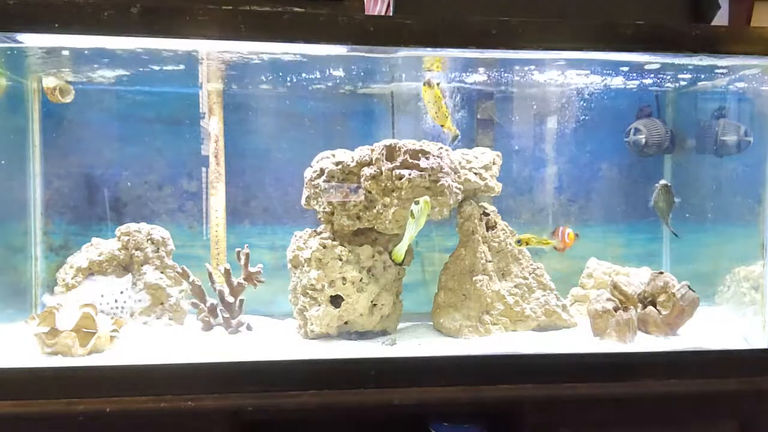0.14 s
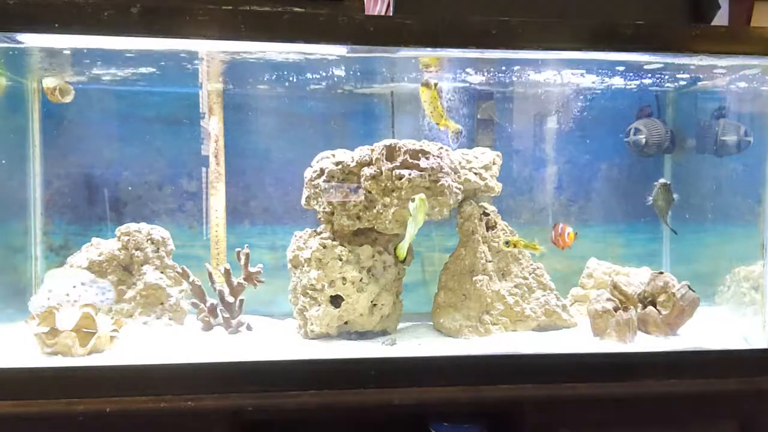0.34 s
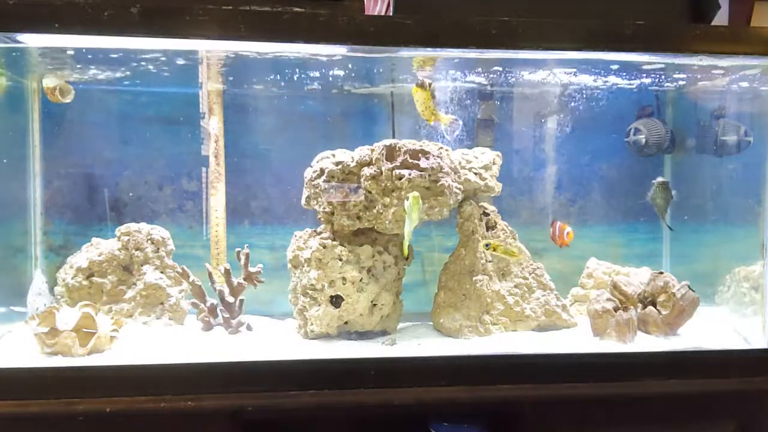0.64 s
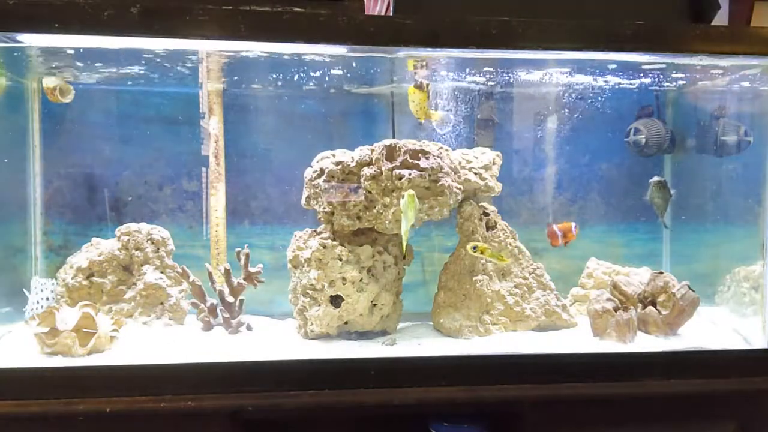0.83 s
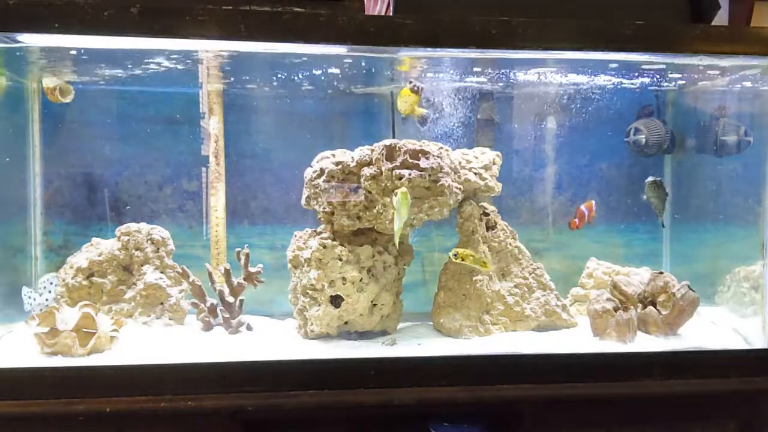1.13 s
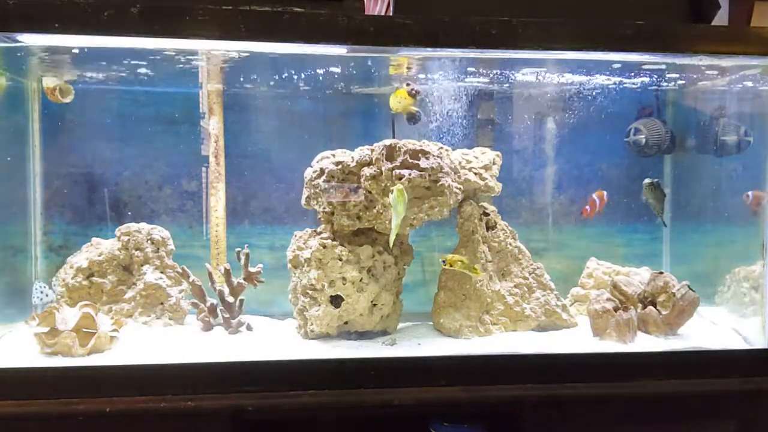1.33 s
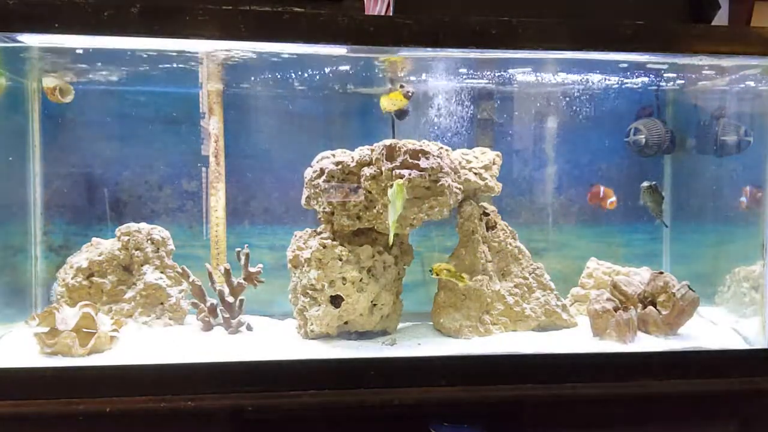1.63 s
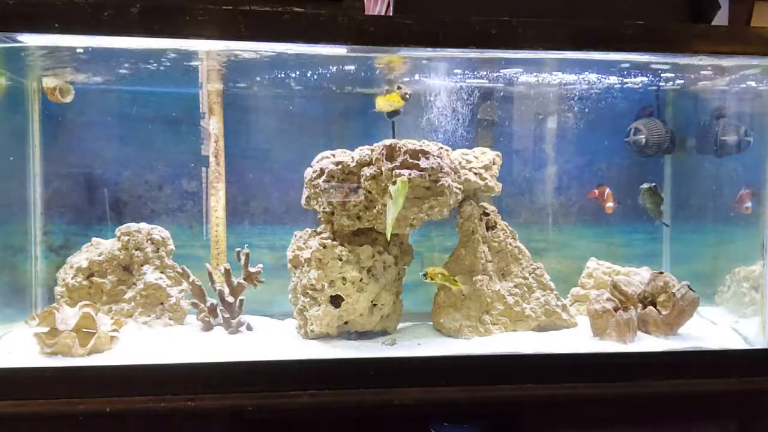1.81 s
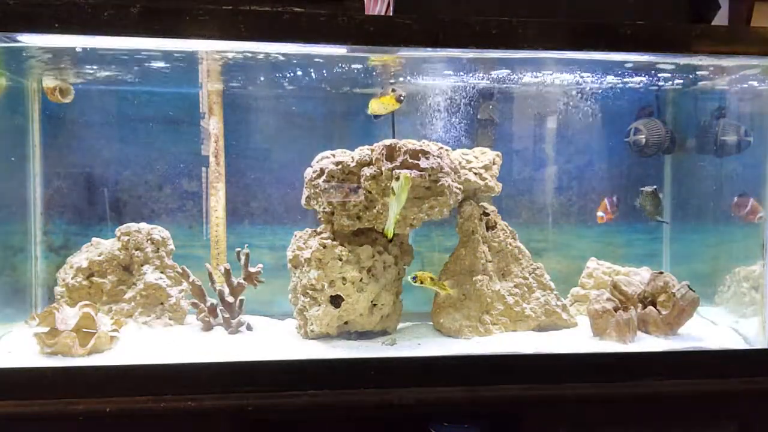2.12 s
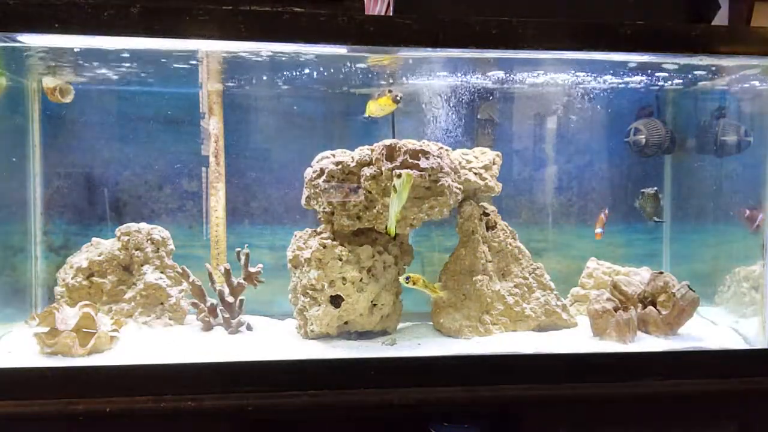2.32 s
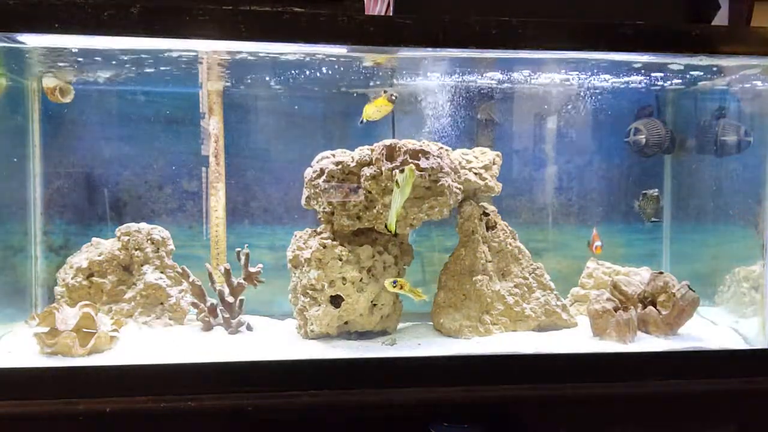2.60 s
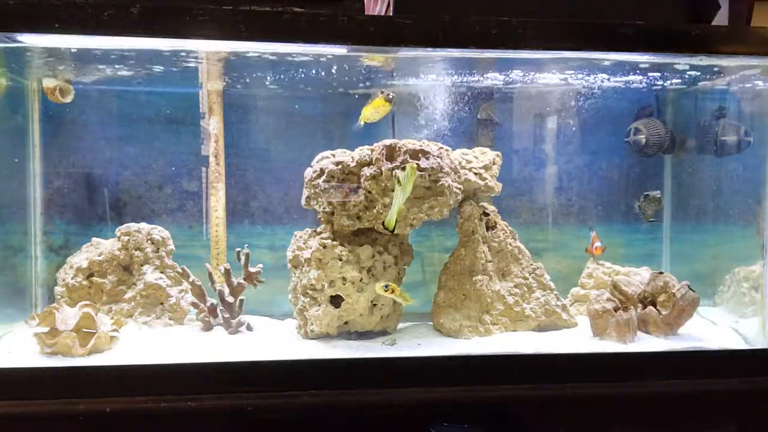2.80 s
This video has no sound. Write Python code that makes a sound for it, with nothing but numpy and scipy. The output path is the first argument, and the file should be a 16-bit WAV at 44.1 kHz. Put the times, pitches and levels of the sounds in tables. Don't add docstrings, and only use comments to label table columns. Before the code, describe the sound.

A steady fish tank pump hum with gentle bubbling, and a brief clatter of tableware nearby

```python
import sys
import numpy as np
from scipy import signal
from scipy.fft import rfft, irfft
from scipy.io import wavfile
from scipy.ndimage import uniform_filter1d

SR = 44100
rng = np.random.default_rng(int(sys.argv[2]) if len(sys.argv) > 2 else 0)


def output_pcm(signal):
    pcm = np.clip(np.atleast_2d(signal).T, -1, 1) * 32767
    wavfile.write(sys.argv[1], SR, np.round(pcm).astype(np.int16))


def gain_from_decibels(decibels):
    exponent = np.asarray(decibels, float) / 20
    return 10 ** exponent


N = 130095
SIDES = np.array([[0.5], [-0.5]])


def evened(x):
    return x / np.sqrt(np.mean(x ** 2) + 1e-20)


def read(points, hz):
    f, value = np.transpose(points)
    return np.interp(np.log(hz + 1), np.log(f + 1), value)


def add(mix, s, sound):
    part = mix[..., round(s * SR):][..., :sound.shape[-1]]
    part += sound[..., :part.shape[-1]]


def tinted(x, points):
    hz = np.fft.rfftfreq(len(x), 1 / SR)
    inside = (hz > 0.8 * points[0][0]) & (hz < points[-1][0])
    return evened(irfft(rfft(x) * gain_from_decibels(read(points, hz)) * inside, len(x)))


def drift(t, top_hz):
    waves = [np.sin(2 * np.pi * (f * t + rng.random())) / np.sqrt(f) for f in np.geomspace(1, top_hz, 24)]
    return evened(sum(waves))


# (multiple of the mains, level [dB rms])
HUM = [(1, -63.5), (2, -47.5), (3, -61), (4, -63.5), (5, -75), (6, -88.5), (8, -76.5), (9, -77), (10, -77)]


def pump():
    mains_hz, waver_db, pan_db, left_lag_s = 60.04, 0.6466, 0.5, 0.00034
    t = np.arange(N) / SR - np.array([[left_lag_s], [0]])
    slow = np.arange(0, N + 200, 200) / SR
    hum = np.zeros((2, N))
    for k, db in HUM:
        waver = waver_db * min(k * k / 4, 8) * np.interp(t, slow, drift(slow, 14))
        hum += np.sqrt(2) * gain_from_decibels(db + waver) * np.sin(2 * np.pi * (k * mains_hz * t + rng.random()))
    return gain_from_decibels(pan_db * SIDES) * hum


def bubble(hz, cycles, glide=0.0037):
    u = np.arange(int(4 * cycles / hz * SR)) / SR * hz / cycles
    return np.sin(2 * np.pi * cycles * (u + glide * u ** 2)) * (1 - np.exp(-u / 0.25)) * np.exp(-1.6 * u)


# (time [s], peak level [dB], pitch [Hz])
BUBBLES = [(0.0923, -53, 3790), (0.1794, -59, 3000), (1.7435, -52, 4380), (2.2793, -57, 3280),
           (2.393, -57, 2370), (2.7, -64, 3530), (2.7367, -55.5, 3470), (2.816, -45, 2080),
           (2.857, -52, 2080), (2.68, -56.5, 2130), (1.66, -61, 3680),
           (0.0856, -52.5, 4250), (0.2046, -62, 6060), (0.3945, -71, 5100), (1.953, -59, 4820),
         (1.9994, -62, 4040), (2.1041, -59, 4130), (2.159, -57.5, 4400), (2.619, -56, 5200),
         (2.632, -68, 5200), (2.667, -68, 5100), (2.672, -66, 5560), (2.694, -70, 4700),
         (2.6958, -62, 5070), (2.7771, -61, 5250)]


def bubbles_and_drips():
    ring_s, glide = 0.0075, -0.0027
    drops = np.zeros(N)
    for s, db, hz in BUBBLES:
        add(drops, s, gain_from_decibels(db + 0.5) * bubble(hz, hz * ring_s, glide))
    return drops + 0.67 * room(drops)


# (time [s], peak level [dB], left minus right [dB], length [s])
SPLASHES = [(0.084, -66, 0, 0.025), (0.198, -70, 1.0, 0.025), (0.248, -65.5, 0, 0.019),
            (0.39, -77, 3, 0.016), (0.464, -74, 2, .015), (0.768, -69, -1, 0.018), (0.905, -68.5, 0, 0.028),
            (1.736, -69, 0, .018), (1.819, -74, 0, .015), (1.946, -74, 0, 0.025), (1.986, -73, -2, .015),
            (2.076, -72, 1, .014), (2.123, -72, 0, 0.042), (2.658, -73, 0, .016)]
# (frequency [Hz], level [dB])
SPRAY = [(3000, -18), (4500, 9), (7000, 0.5), (12000, -3.5), (16000, -10)]


def splashes():
    rise_s = 0.005
    out, t = np.zeros((2, N)), np.arange(3000) / SR
    for s, db, pan_db, length in SPLASHES:
        puff = np.array([tinted(rng.standard_normal(3000), SPRAY) for _ in "lr"])
        swell = np.minimum(t / rise_s, 1) * np.exp(-(t / length) ** 2)
        add(out, s, gain_from_decibels(db - 2 + pan_db * SIDES) * puff * swell)
    return out


def fizz():
    per_s, level_db, middle_hz, spread = 400, -70.5, 3405, 0.2
    out = np.zeros((2, N))
    size = gain_from_decibels(2.4 * np.minimum(rng.exponential(1, N), 5)) * (rng.random(N) < per_s / SR)
    kind = rng.integers(0, 40, N)
    for k, (a, b) in enumerate(rng.standard_normal((40, 2))):
        hz = middle_hz * np.exp(spread * a)
        ring = gain_from_decibels(read(WATER, hz)) * bubble(hz, cycles=46)
        grain = signal.oaconvolve(size * (kind == k), ring)[:N]
        out += [grain * gain_from_decibels(2 * b), np.roll(grain, k % 7 - 3) / gain_from_decibels(2 * b)]
    return gain_from_decibels(level_db) * evened(out)


def struck(hits, modes, rub, twin_hz, twin):
    attack_s, attack_cycles, rattle = 0.001, 0.8, 0.5
    out, t = np.zeros(N), np.arange(12000) / SR
    for s, ring_db, rub_db, rub_s, tilt_db in hits:
        ring = np.zeros(len(t))
        for hz, db, t60 in modes:
            decay = gain_from_decibels(db + tilt_db * np.log2(hz / 3000) - 60 * t / t60)
            onset = 1 - np.exp(-t * hz / attack_cycles)
            tone = np.sin(2 * np.pi * hz * t)
            upper = twin * np.sin(2 * np.pi * ((hz + twin_hz) * t + rng.random()))
            lower = 0.74 * twin * np.sin(2 * np.pi * ((hz - 1.42 * twin_hz) * t + rng.random()))
            uneven = 1 + rattle * evened(uniform_filter1d(rng.standard_normal(len(t)), size=500))
            ring += decay * onset * (tone + upper + lower) * uneven
        colour = [(hz, db + tilt_db * np.log2(hz / 3000)) for hz, db in rub]
        scrape = tinted(rng.standard_normal(len(t)), colour) * gain_from_decibels(rub_db - 60 * t / rub_s)
        add(out, s, (gain_from_decibels(ring_db) * ring + scrape) * np.minimum(t / attack_s, 1))
    return out


# (time [s], ring [dB], contact [dB], contact t60 [s], brightness [dB per octave])
DISH_HITS = [
    (.630, -42.5, -36.5, 0.045, -2.1),
    (.642, -50, -48, .04, 2),
    (.652, -52.5, -47.5, 0.17, 0.5),
    (.658, -53.5, -60, .04, 0),
    (.681, -55, -54, 0.098, -3.5),
]
# (frequency [Hz], level [dB], t60 [s])
DISH = [(422, 4.5, 0.049), (1179, -6, 0.13), (1300, -19, 0.055), (2116, -7.5, 0.21), (2353, -2.5, 0.14),
        (2396, -11, 0.18), (3465, -11, 0.084), (4457, -6.5, 0.15), (5000, -17.5, 0.053), (5426, -15, .12),
        (5920, -5.5, 0.15), (7240, -24, 0.084), (7600, -19, .1), (9060, -10.5, 0.18)]
# (frequency [Hz], level [dB])
DISH_RUB = [(300, -15), (1100, -0.5), (2300, -5), (6000, -4), (8000, -18.5), (16000, -17)]


def dish():
    return struck(DISH_HITS, DISH, DISH_RUB, twin_hz=44.8, twin=0.25)


CUP_HITS = [
    (1.0154, -37.5, -38.5, 0.076, 0.7),
    (1.024, -53.5, -52, 0.044, 0),
    (1.04, -55.5, -57, 0.043, -1),
    (1.072, -73, -75, 0.022, -3),
]
# (frequency [Hz], level [dB], t60 [s])
CUP = [(480, 3.5, 0.047), (536, 1, .06), (667, -1.5, 0.08), (780, 0, 0.025), (964, 0.5, 0.05),
       (1126, 2, 0.052), (1370, -24, 0.03), (1800, -7, 0.032), (2470, -9, 0.019)]
# (frequency [Hz], level [dB])
CUP_RUB = [(300, -16), (600, 14), (1300, -4.5), (2000, -36), (3000, -23), (4500, -50)]


def cup():
    return struck(CUP_HITS, CUP, CUP_RUB, twin_hz=29.2, twin=0.23)


SPOON_HITS = [
    (1.2655, -42, -40, 0.033, 2.2),
    (1.355, -50, -52, 0.054, -.6),
    (1.391, -74, -66, 0.026, 0.5),
]
# (frequency [Hz], level [dB], t60 [s])
SPOON = [(517, 2.5, 0.038), (716, -3.5, 0.067), (1110, -3, .06), (1274, 1.5, 0.063), (1920, -11, 0.04),
         (3272, 7, 0.07), (5803, -7, 0.13), (6970, -12, 0.056), (8940, -9.5, 0.077), (10060, -21, 0.073),
         (12900, -16, 0.06), (13750, -18, .1), (15120, -20, 0.07), (15580, -19, 0.053)]
# (frequency [Hz], level [dB])
SPOON_RUB = [(400, 6.5), (1500, 9.5), (2800, 5.5), (4800, -1), (7500, -0.5), (16000, -31)]


def spoon():
    return struck(SPOON_HITS, SPOON, SPOON_RUB, twin_hz=24.7, twin=0.25)


LID_HITS = [
    (1.3458, -37, -40, 0.081, 0.3),
    (1.356, -53.5, -61, 0.045, -0.4),
]
# (frequency [Hz], level [dB], t60 [s])
LID = [(502, -22, 0.057), (570, -6, 0.067), (670, -4, 0.12), (400, -4, 0.055), (757, -2.5, 0.035),
       (1000, -2, 0.057), (1144, -2, 0.068), (1325, -1.5, 0.076), (1819, 3, 0.045), (2520, -16, .03)]


def lid():
    return struck(LID_HITS, LID, CUP_RUB, twin_hz=30, twin=0.24)


FORK_HITS = [
    (1.4105, -46.5, -43, 0.031, 1),
    (1.419, -52.5, -46.5, 0.046, -2.6),
    (1.426, -54.5, -61, .04, -2.6),
]
# (frequency [Hz], level [dB], t60 [s])
FORK = [(675, -1, 0.059), (973, -14, 0.054), (1270, 5, .04), (1870, -8, 0.07), (2460, -11, 0.063),
        (2805, -2, 0.056), (3090, 1, 0.042), (3310, 4, .05), (4474, -3.5, 0.032), (4890, -5, .05),
        (5860, -15, 0.25), (8960, -23, 0.11), (12600, -20, .08)]


def fork():
    return struck(FORK_HITS, FORK, SPOON_RUB, twin_hz=40, twin=0.28)


SPOON_AGAIN_HITS = [
    (1.519, -46.5, -47.5, 0.084, 0.16),
]
# (frequency [Hz], level [dB], t60 [s])
SPOON_AGAIN = [(568, -4.5, 0.091), (984, -7, 0.07), (1300, -1, 0.11), (1910, -12, 0.2), (2126, -6, 0.071),
               (2760, -5.5, 0.072), (3310, 0, 0.23), (4800, -14, 0.07), (5890, 0.5, 0.17), (6950, -18, .1),
               (9022, -17, .13), (9850, -14, 0.06), (13400, -18, 0.11), (14210, -18, 0.08)]


def spoon_again():
    return struck(SPOON_AGAIN_HITS, SPOON_AGAIN, SPOON_RUB, twin_hz=31.0, twin=0.53)


# (frequency [Hz], right minus left [dB])
SHADOW = [(300, 3), (1500, 3.5), (5000, 8), (14000, 1)]


def tableware():
    left_lag, room_db = 20, -3
    table = dish() + spoon() + spoon_again() + cup() + lid() + fork()
    near = np.array([np.roll(table, left_lag), table]) + gain_from_decibels(room_db) * room(table)
    shade_db = -SIDES * read(SHADOW, np.fft.rfftfreq(N, 1 / SR))
    return irfft(rfft(near) * gain_from_decibels(shade_db), N)


# (frequency [Hz], t60 [s])
ROOM = [(300, 0.21), (1500, 0.24), (5000, 0.22), (14000, 0.17)]


def room(x):
    taps = np.zeros((2, SR // 2))
    at = np.arange(200, SR // 2 - 20, 20)
    when = at + rng.integers(0, 20, (2, len(at)))
    signs = rng.choice([-1., 1.], (2, len(at)))
    np.put_along_axis(taps, when, signs, 1)
    hz, t, z = signal.stft(taps, SR, nperseg=256)
    tail = signal.istft(z * gain_from_decibels(-60 * t / read(ROOM, hz)[:, None]), SR, nperseg=256)[1]
    return signal.fftconvolve(x[None], tail / np.linalg.norm(tail[0]), axes=1)[:, :N]


# (frequency [Hz], likeness [0 to 1])
SAME = [(60, 1), (180, 1), (550, 0.54), (1650, 0.018), (4970, 0.033), (15000, 0.18)]
# (frequency [Hz], left minus right [dB])
LEAN = [(60, 1.7), (240, 0), (950, -0.8), (3770, 2.5), (15000, -1.5)]


def wash(points, size, patchy_db, comb=0.61):
    flicker_db = 0.5
    frames, hz = 4 * N // size + 5, np.fft.rfftfreq(size, 1 / SR)
    a, b, c, d, patches = rng.standard_normal((frames, len(hz), 5)).T
    patches = evened(uniform_filter1d(uniform_filter1d(patches, size=3, axis=0), size=8, axis=1))
    colour = evened(uniform_filter1d(rng.standard_normal((len(hz), 1)), size=2, axis=0))
    patches = patches + comb * colour
    same = np.clip(read(SAME, hz), 0, 0.93)[:, None]
    left = a + 1j * b
    right = same * left + np.sqrt(1 - same ** 2) * (c + 1j * d)
    right = right / gain_from_decibels(read(LEAN, hz))[:, None]
    inside = (hz >= points[0][0]) & (hz <= points[-1][0])
    flicker = flicker_db * drift(np.arange(frames) * size / 4 / SR, 30)
    level = gain_from_decibels(read(points, hz)[:, None] + patchy_db * patches + flicker)
    spectra = np.array([left, right]) * level * inside[:, None]
    return evened(signal.istft(spectra, nperseg=size, noverlap=3 * size // 4)[1][:, :N])


# (frequency [Hz], level [dB per Hz])
WATER = [(410, -3), (700, -8.5), (1060, -6.5), (2000, -7.5), (2800, -13.5), (3500, -9), (6000, -21.5),
         (7200, -28.5), (16000, -36)]


def water_hiss():
    return gain_from_decibels(-66 + 0.5) * wash(WATER, size=1024, patchy_db=2.5)


# (frequency [Hz], level [dB per Hz])
DRONE = [(395, -11.5), (428, 6.5), (450, 1), (475, -14), (500, -0.5)]


def filter_box():
    return gain_from_decibels(-70) * wash(DRONE, size=4096, patchy_db=-1.0)


# (frequency [Hz], level [dB per Hz])
RUMBLE = [(16, -12), (60, -3), (84, -2.5), (98, -24.5), (130, -9.5), (280, -11), (440, -23), (800, -23.5)]


def room_rumble():
    return gain_from_decibels(-56.5) * wash(RUMBLE, size=8192, patchy_db=1.5)


def scene():
    near = tableware() + pump() + fizz() + splashes() + bubbles_and_drips()
    return near + filter_box() + room_rumble() + water_hiss()


def low_pass(x):
    return signal.sosfilt(signal.butter(12, 16510, fs=SR, output="sos"), x)


def record(dry):
    return low_pass(dry)


dry = scene()
out = record(dry)
output_pcm(out)
```